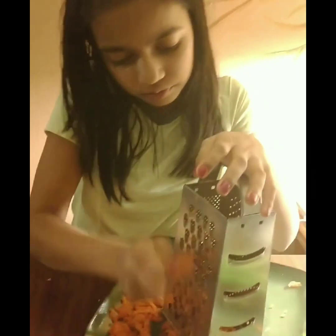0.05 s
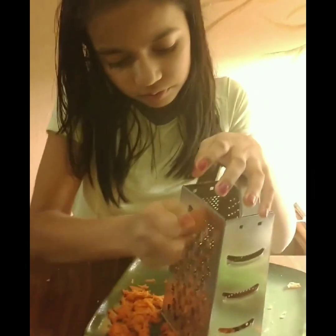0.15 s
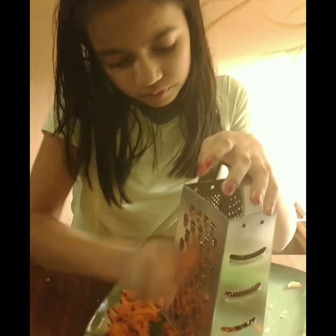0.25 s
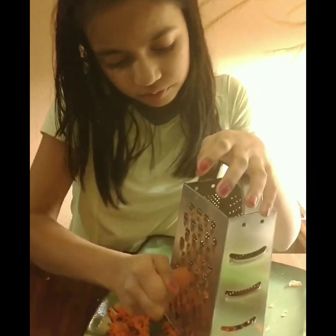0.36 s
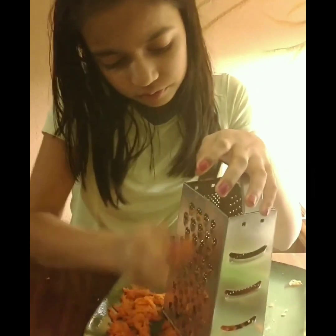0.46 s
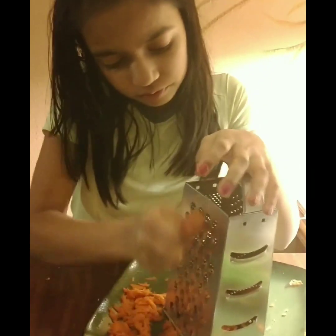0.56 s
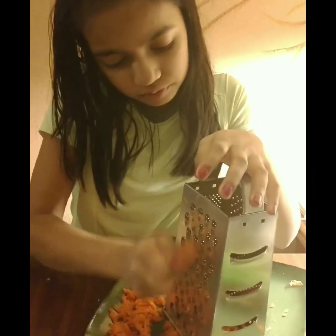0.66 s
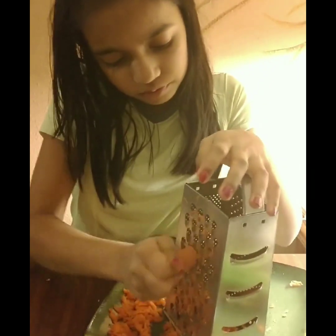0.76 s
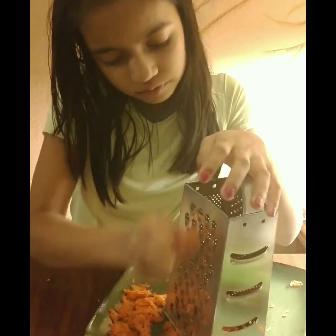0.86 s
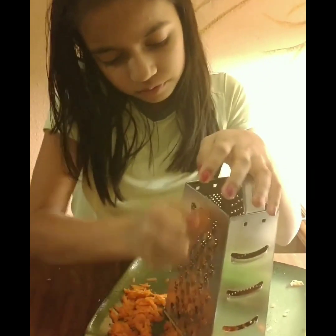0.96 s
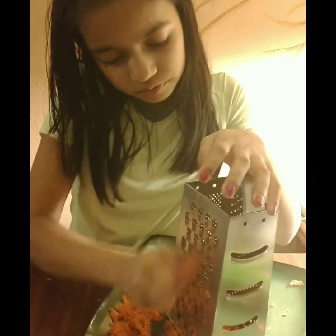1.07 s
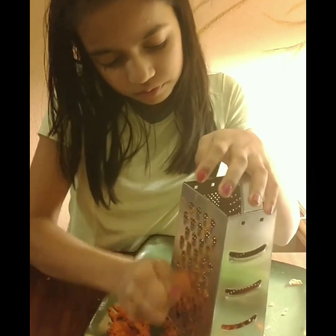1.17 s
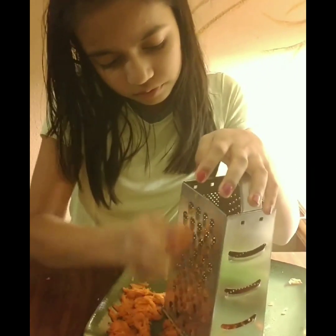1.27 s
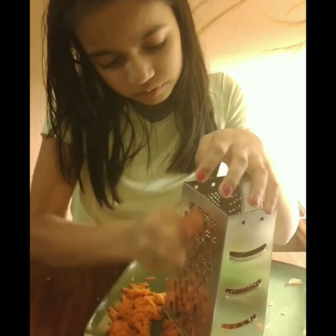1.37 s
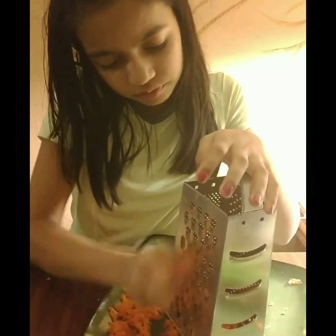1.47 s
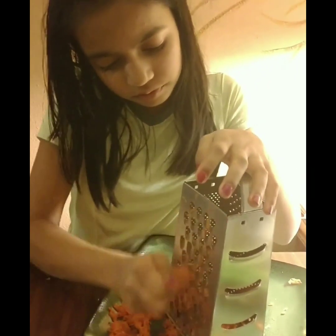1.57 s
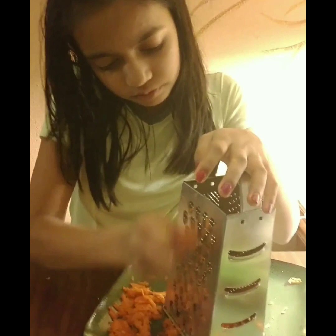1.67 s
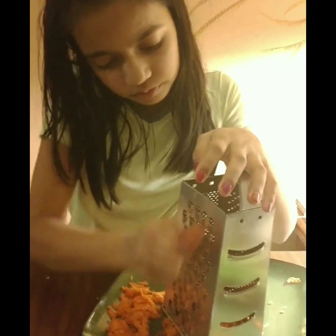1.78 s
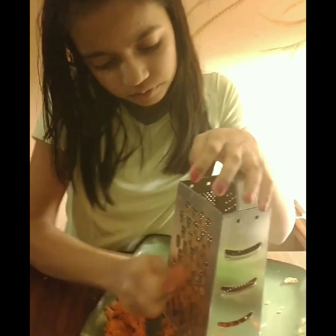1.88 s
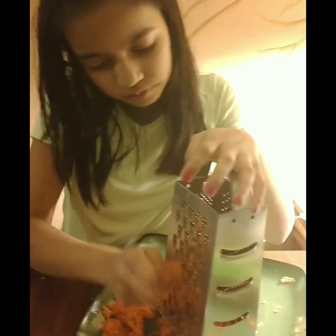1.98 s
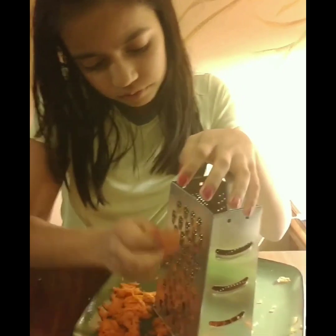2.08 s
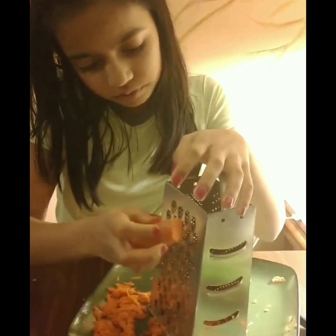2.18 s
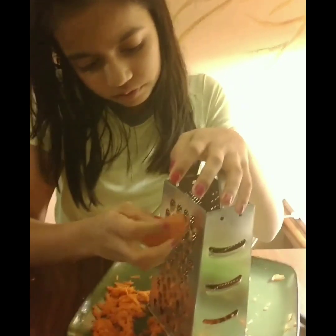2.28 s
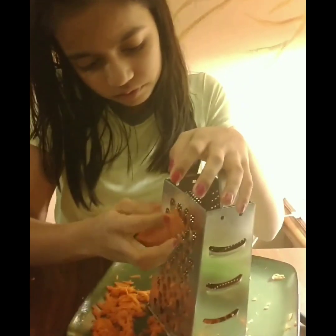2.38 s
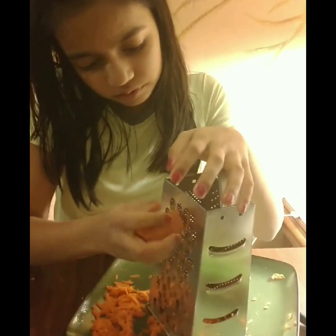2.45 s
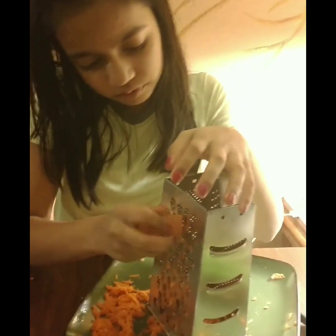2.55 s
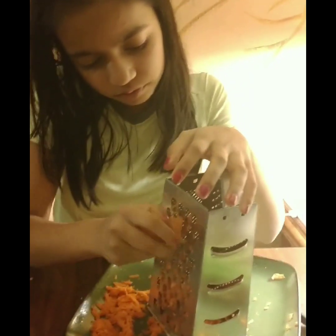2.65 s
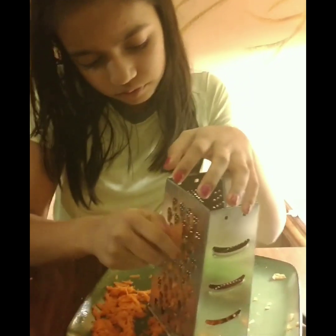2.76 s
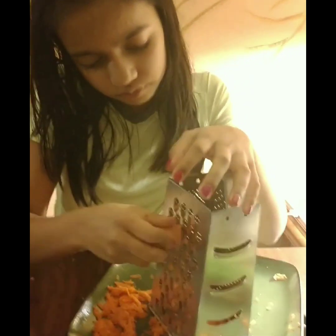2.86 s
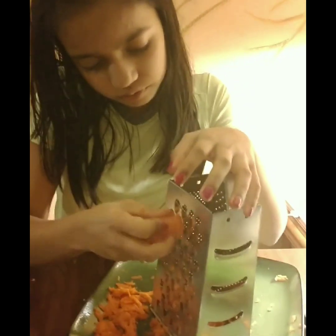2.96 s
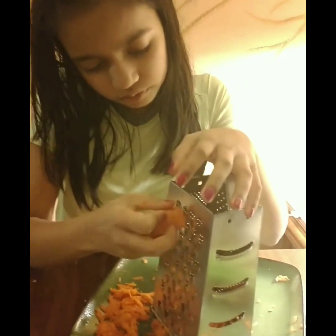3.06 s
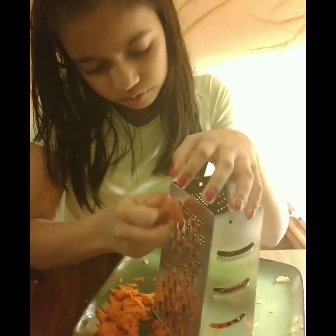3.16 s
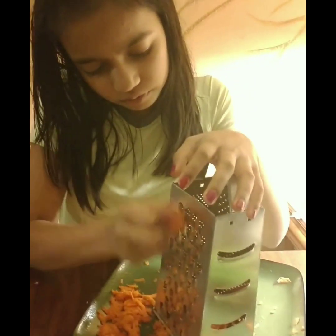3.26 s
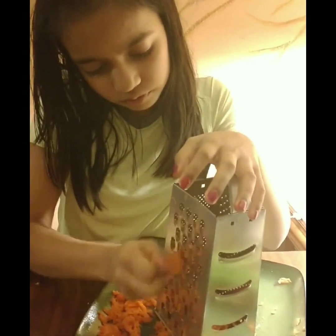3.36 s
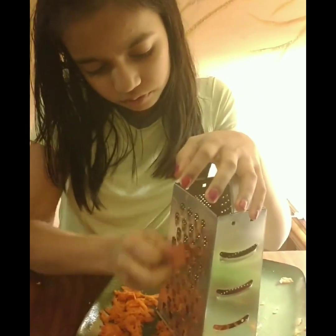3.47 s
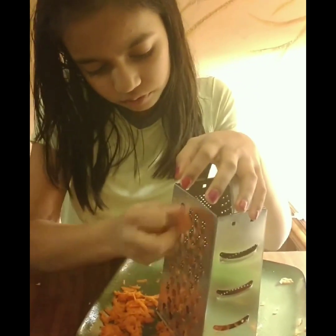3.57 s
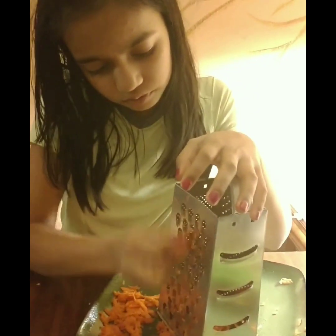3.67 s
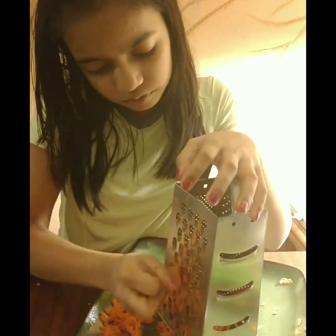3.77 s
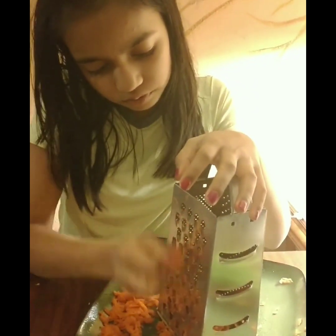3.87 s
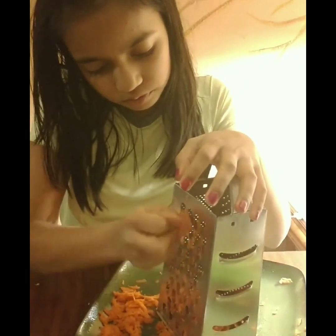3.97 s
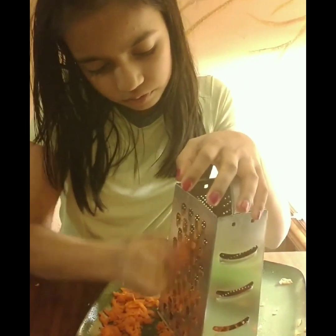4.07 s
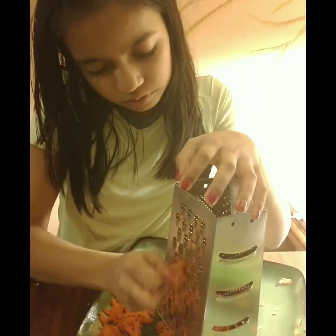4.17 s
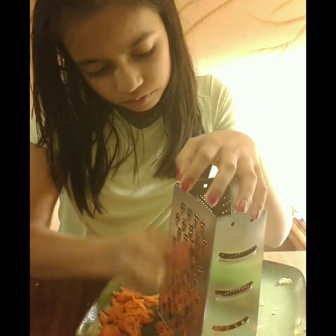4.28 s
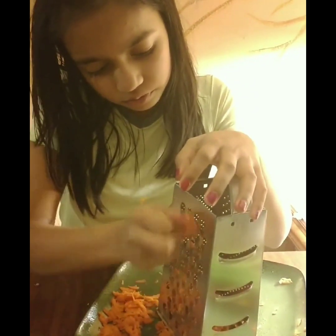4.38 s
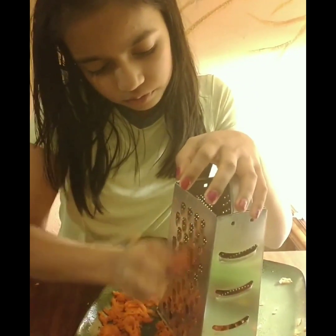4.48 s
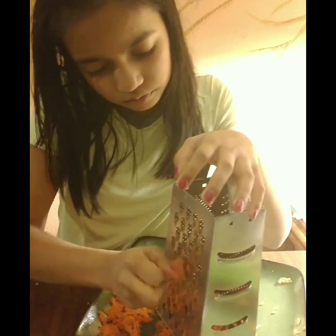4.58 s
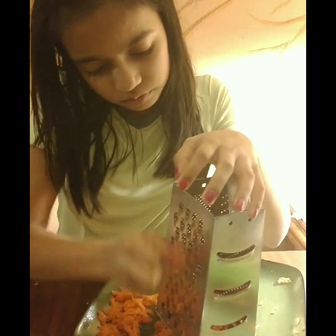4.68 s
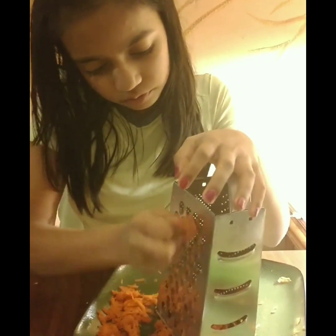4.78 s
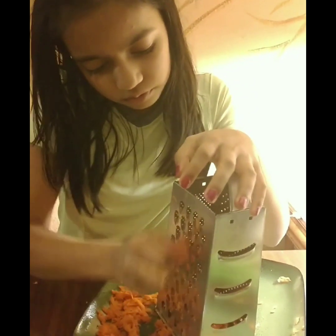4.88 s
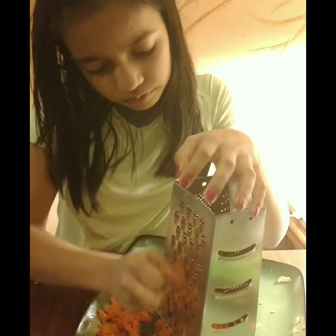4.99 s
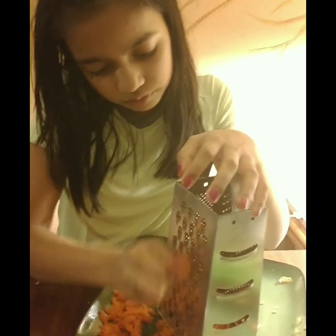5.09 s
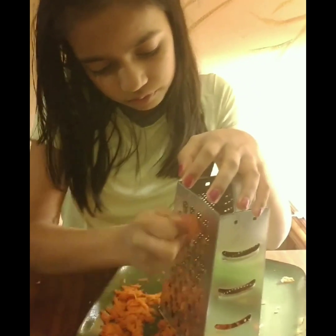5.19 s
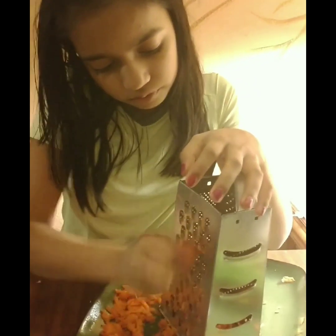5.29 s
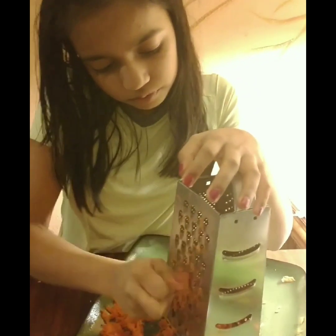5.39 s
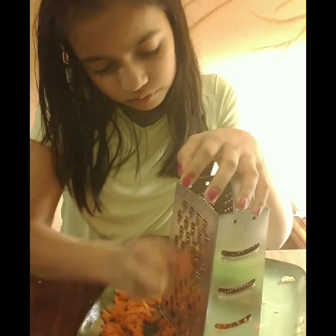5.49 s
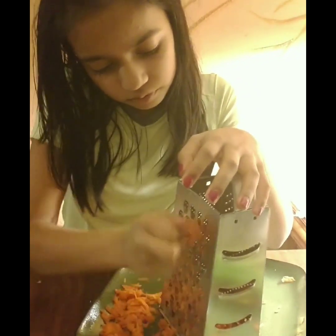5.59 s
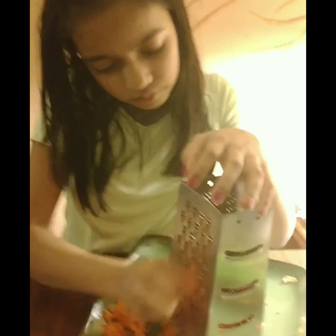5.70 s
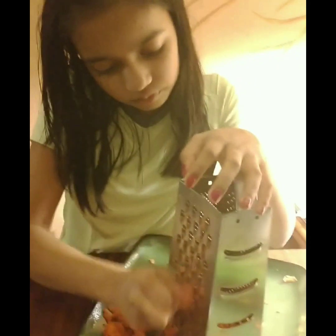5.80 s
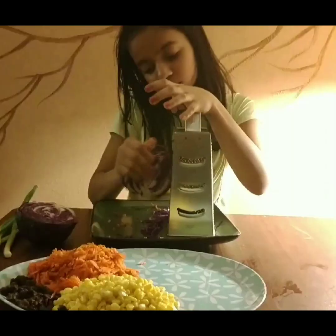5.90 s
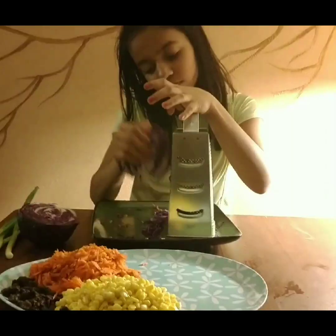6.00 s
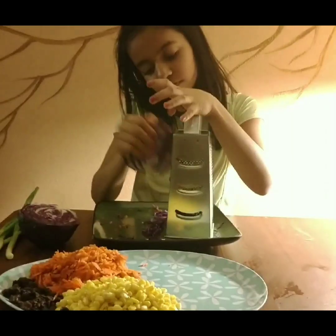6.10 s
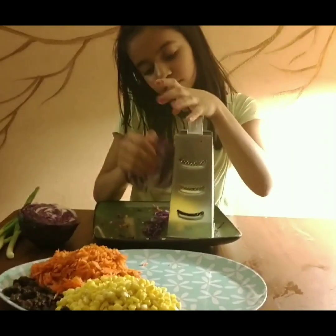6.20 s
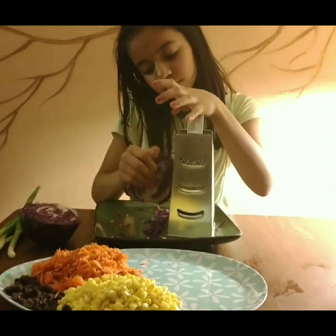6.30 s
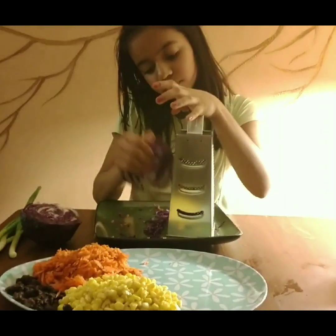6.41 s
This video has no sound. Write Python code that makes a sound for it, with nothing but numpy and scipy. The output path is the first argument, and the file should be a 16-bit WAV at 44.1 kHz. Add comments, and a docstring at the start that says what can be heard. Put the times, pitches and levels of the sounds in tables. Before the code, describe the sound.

A carrot is grated close to the microphone in a small, quiet kitchen. Six even strokes give a wet, crunchy rasp with dull thumps and a hollow metal ring. After a pause with faint ticks, seven more strokes follow. The grater knocks on its plate twice along the way. The sound cuts out for an instant, then cabbage is grated further off, with light scrapes and one hard stroke.

```python
"""A carrot rasps down a steel box grater on a plate: six strokes, a pause to turn it, seven more. Rows of teeth
catch and tear the flesh, giving a wet crunch on top, a shimmer from the steel face and a hollow thrum from the
box. The carrot adds thumps and small wet ticks; twice the grater rocks on the plate. Then the scene changes:
cabbage is grated further away, light scrapes, then a hard one. Underneath lies the room tone of a small
kitchen, soft air and a faint mains hum."""
import sys
import numpy as np
from scipy import signal
from scipy.fft import rfft, irfft
from scipy.io import wavfile
from scipy.ndimage import uniform_filter1d

SR = 44100
rng = np.random.default_rng(int(sys.argv[2]) if len(sys.argv) > 2 else 0)


def generate_wav(signal):
    """Clip the signal to [-1, 1] and save it as 16-bit WAV at the path in sys.argv[1]."""
    frames = np.transpose(np.atleast_2d(signal))
    scaled = np.clip(frames, -1, 1) * 32767
    pcm = np.round(scaled).astype(np.int16)
    wavfile.write(sys.argv[1], SR, pcm)


N = 284332
T = np.arange(N) / SR

# carrot strokes, and light brushes as it is turned or lifted; levels are ahead of the layer trims:
# t/s, speed-up/s, slow-down/s, first bite below full push/dB, tear level/dB, thrum level/dB, face level/dB
CARROT_STROKES = [ (0.002, .085, 0.054, 13, -45, -35, -44), (0.392, 0.1, 0.031, 14, -44.5, -32.5, -48),
                  (0.771, 0.084, 0.045, 12, -45, -34, -47.5), (1.169, 0.092, 0.054, 10, -47.5, -34, -48.5),
                  (1.574, 0.089, 0.039, 10.5, -44.5, -31.5, -47),
                  (1.953, 0.093, 0.043, 15.5, -44, -33, -44.5), (2.57, .020, .120, 3, -76, -68, -82),
                  (3.02, 0.024, 0.023, 8, -77, -57, -67), (3.482, 0.063, 0.046, 5, -54, -44.5, -55),
                  (3.812, .120, .034, 15, -47, -38, -48), (4.11, 0.055, 0.073, 6, -64.5, -56, -59.5),
                  (4.228, 0.074, 0.043, 11.5, -46, -35, -43), (4.592, 0.1, 0.045, 11, -47.5, -33.5, -46.5),
                  (5.004, 0.069, 0.082, 11, -48.5, -36, -44), (5.412, .085, 0.057, 17, -45.5, -31.5, -40),
                  (5.799, 0.086, 0.023, 13.5, -45, -31, -43.5)]
# the carrot lands on the grater or snags on a tooth: t/s, level/dB
CARROT_BUMPS = [(0.002, -32), (0.057, -24), (0.139, -28.5), (0.379, -26), (0.499, -23), (0.746, -35),
                (0.787, -32), (1.137, -32), (1.281, -21.5), (1.322, -28), (1.554, -24.5), (1.722, -37.5),
                (1.933, -36), (1.98, -26.5), (2.509, -42), (3.52, -35), (3.788, -38), (3.833, -27.5),
                (4.18, -38), (4.23, -24), (4.339, -25.5), (4.58, -32.5), (4.737, -32.5), (4.981, -27),
                (5.037, -24), (5.127, -21.5), (5.385, -32.5), (5.459, -22), (5.53, -27), (5.777, -32),
                (5.858, -21)]
# small wet ticks and scrapes as the carrot lands, is handled or sheds shreds: t/s, level/dB
WET_TICKS = [(0.3763, -50), (1.552, -45), (2.5813, -52.5), (2.631, -63), (2.6903, -57), (3.652, -52),
             (4.385, -55), (4.581, -42), (4.983, -44.5), (5.634, -46), (6.202, -47)]
# the grater's rim strikes the plate: t/s, level/dB, contact/ms
RIM_KNOCKS = [(1.0154, -12, 0.17), (4.2289, -18.5, 0.21)]
# cabbage strokes: t/s, speed-up/s, slow-down/s, first bite below full push/dB, tear level/dB, thrum level/dB
CABBAGE_STROKES = [(6.02, 0.045, 0.032, 13, -66.5, -52.5), (6.2, 0.019, 0.092, -15, -67.5, -56.5),
                   (6.348, 0.011, 0.035, 9, -52.5, -38.5), (6.374, 0.011, 0.047, -12, -47, -27)]
# the cabbage slams into the blades: t/s, level/dB, contact/ms
CABBAGE_JOLTS = [(6.0752, -29.5, 0.17), (6.352, -50, 0.36), (6.376, -21, 0.086), (6.3995, -12, 0.53),
                 (6.438, -38, 0.23)]
# tone curve of tearing flesh: f/Hz, level/dB
TEAR_SPECTRUM = [(550, -6), (900, 9.5), (1300, 2), (1650, -3.5), (2200, -3.5), (2900, 8), (3600, 1.5),
                 (4400, -1), (5600, -1), (6600, -2.5), (11000, -3), (12300, -5), (15800, -5)]
# the grater's toothed face: f/Hz, width/Hz, level/dB
FACE_MODES = [(850, 40, -8), (950, 63, 1), (1370, 44, -12.5), (1590, 13, -2.5), (1626, 62, -6.5),
              (2675, 41, -0.5), (2873, 30, -0.5), (3050, 37, -1.5), (3270, 24, -2), (3550, 44, -4.5),
              (5490, 43, -6.5), (5770, 60, -14)]
# the steel box, damped by the hand on top: f/Hz, width/Hz, level/dB
BOX_MODES = [(153.6, 28, -15), (164.6, 9.6, -16.5), (238.3, 12.7, -4), (277, 26, -9.5), (297, 22, -4.5),
             (336, 21, 0.5), (368.7, 13, 0), (419.5, 29, -5.5), (546, 10, -1.5), (560.4, 16.6, -11.5),
             (646, 60, -17), (754, 134, -9.5), (835, 15, -21), (889, 41, -8), (1010, 60, -16),
             (1016, 138, -9.5), (1217, 108, -10.5), (1454, 13, -13.5), (1562, 93, -19), (1684, 160, -10.5)]
# the plate on the table: f/Hz, width/Hz, level/dB
PLATE_MODES = [(168, 34, -35), (245, 20, -27), (280, 15, -23), (337, 29, 2.5), (365, 15, 10),
               (440, 18, -27), (420, 16, 5.5), (533, 14, 15.5), (545, 14, -29), (668, 19, 1.5),
               (980, 50, -25), (943, 66, -32), (990, 28, -9), (1060, 61, -19.5), (1265, 20, -11.5),
               (1497, 58, -41), (1640, 54, -21), (2470, 38, -22), (3000, 830, -24)]
# grater and plate pressed together under the cabbage: f/Hz, width/Hz, level/dB
PRESSED_MODES = [(167, 13, -41), (262.5, 16, 2.5), (378, 21, 2.5), (474, 18, -0.5), (550, 21, -3),
                 (647, 15, 3), (697, 34, -1.5), (742, 17, -2), (833, 42, 1), (935, 24, -9),
                 (1020, 35, -1.5), (1073, 16, -4), (1200, 120, -11), (1280, 29, -3.5), (1270, 26, -15),
                 (1500, 30, -27), (1647, 60, -3), (1600, 45, -23), (1780, 20, -35)]
# tone curve of the kitchen air: f/Hz, level/dB
AIR_SPECTRUM = [(15, -50), (25, -11), (55, -15.5), (86, -12), (123, -5), (148, -14), (184, 0.5),
                (216, -10.5), (498, -8.5), (618, -13), (1540, -19), (1920, -29), (2870, -23), (4300, -31),
                (15700, -39.5)]
# two hollow dips in the tone: f/Hz, width/Hz, level/dB
TONE_DIPS = [(2156, 116, -17), (4370, 490, -11)]

TOP_HZ = 15830  # upper edge of the treble


def carrot(tear_trim_db=3.5, thrum_trim_db=-1.37, face_trim_db=-2):
    """Downstrokes on the coarse face; the steel rings on a little after the tearing lets go."""
    tear = amp(tear_trim_db) * stroke_envelope(CARROT_STROKES, column=4)
    thrum = amp(thrum_trim_db) * stroke_envelope(CARROT_STROKES, column=5, hold_s=0.0042)
    shimmer = amp(face_trim_db) * stroke_envelope(CARROT_STROKES, column=6, hold_s=0.0087)
    return grating(tear, thrum, shimmer, steel_box(), rows_per_s=140, row_scatter_db=0.5,
                   tear_ms=13, crackle_db=-3, judder_db=-4)


def stroke_envelope(table, column, hold_s=0, contact_s=0.0054, sag_db=4, release_db_per_s=283,
                    brush_db=-23, brush_fade_db_per_s=62):
    """One layer's gain: each stroke bites, follows the hand's speed, sags, lets go and brushes back up."""
    out = np.zeros(N)
    for stroke in table:
        start, rise_s, slow_s, bite_db = stroke[:4]
        age = T - start
        contact = np.clip(age / contact_s, 0, 1)  # the flesh sinks onto the teeth
        speeding = np.clip(age / rise_s, 0, 1)
        slowing = np.clip((age - rise_s) / slow_s, 0, 1)
        released_s = np.maximum(age - rise_s - slow_s - hold_s, 0)
        push_db = -bite_db * (1 - speeding) ** 2 - sag_db * slowing ** 2 - release_db_per_s * released_s
        effort_db = np.maximum(push_db, brush_db - brush_fade_db_per_s * released_s)
        out = np.maximum(out, contact * amp(stroke[column] + effort_db))
    return out


def grating(tear_gain, thrum_gain, face_gain, body, rows_per_s, row_scatter_db,
            tear_ms, crackle_db, judder_db):
    """Each row of teeth jerks the box and opens a short tear, in which cells burst by the thousand."""
    rows = catches(rows_per_s, jitter=.45, scatter_db=row_scatter_db, count=3000)
    tearing = unit(convolve(rows, np.exp(-T[:2048] * 1000 / tear_ms)))
    cells = catches(2400, jitter=.9, scatter_db=2.5, count=30000) * rng.choice([-1, 1], N)
    grit = rng.standard_normal(N) + amp(crackle_db) * unit(cells)
    crunch = unit(np.sqrt(np.abs(tearing)) * grit)
    rasp = convolve(unit(shreds(crunch)) * tear_gain, colour(TEAR_SPECTRUM))
    # the box feels the jerks of the rows and the drag of the wet flesh between them
    drag = unit(crunch + amp(judder_db) * unit(rows - rows.mean()))
    return rasp + steel_face(crunch) * face_gain + convolve(drag * thrum_gain, body)


def catches(per_s, jitter, scatter_db, count):
    """Ragged pulses, uneven in timing and size, as teeth bite and let go."""
    timing, size = rng.standard_normal((count, 2)).T
    at = (np.cumsum(np.exp(jitter * timing)) / per_s * SR).astype(int)
    return np.bincount(at[at < N], amp(scatter_db * size[at < N]), N)


def shreds(crunch, flare_db=2.5, flares_per_s=80, band_count=14):
    """Every shred tears at a pitch of its own, so neighbouring bands flare up separately."""
    spectrum, hz = rfft(crunch), np.fft.rfftfreq(N, 1 / SR)
    centres = np.linspace(0, TOP_HZ, band_count)
    bands = (irfft(spectrum * np.interp(hz, centres, share), N) for share in np.eye(band_count))
    return sum(band * amp(flare_db * wander(flares_per_s)) for band in bands)


def steel_face(crunch, shift_db=6, shifts_per_s=16, bend_s=.0015, bends_per_s=7):
    """Shimmer: the sliding flesh favours one mode, then another, and its weight bends their pitch."""
    out = 0
    for hz, width, db in FACE_MODES:
        mode = resonance(crunch, hz, width)
        bent = np.interp(T + bend_s * wander(bends_per_s), T, mode)
        out = out + unit(bent) * amp(db + shift_db * np.tanh(wander(shifts_per_s)))
    return unit(out) * np.std(crunch)


def steel_box():
    """The hollow box takes a few milliseconds to speak."""
    return ring(BOX_MODES, swell_s=0.004393)


def wet_ticks(trim_db=-3, decay_s=0.044):
    """Small wet ticks and scrapes as the carrot lands, is handled or sheds shreds."""
    out, tear = np.zeros(N), colour(TEAR_SPECTRUM)
    decay = np.exp(-T[:len(tear)] / decay_s)
    for s, db in WET_TICKS:
        tick = convolve(rng.standard_normal(len(tear)) * decay, tear)
        add(out, s, amp(db + trim_db) * tick / np.abs(tick).max())
    return out


def bumps(contact_ms=1.87):
    """The soft carrot lands on the box with a dull thump."""
    hits = [(s, db, contact_ms) for s, db in CARROT_BUMPS]
    return blows(hits, steel_box(), chatter_db=-1, chatter_s=.022)


def plate_knocks():
    """The grater rocks and its hard rim rings the plate."""
    return blows(RIM_KNOCKS, ring(PLATE_MODES, swell_s=0.0013), chatter_db=-10, chatter_s=.035)


def cabbage(tear_trim_db=1, thrum_trim_db=-1, face_to_tear_db=-8):
    """The firm cabbage shakes grater and plate together."""
    tear = amp(tear_trim_db) * stroke_envelope(CABBAGE_STROKES, column=4)
    thrum = amp(thrum_trim_db) * stroke_envelope(CABBAGE_STROKES, column=5)
    body = ring(PRESSED_MODES, swell_s=0.0015)
    shredding = grating(tear, thrum, amp(face_to_tear_db) * tear, body, rows_per_s=190,
                        row_scatter_db=4, tear_ms=7, crackle_db=-5.5, judder_db=-4.5)
    return shredding + blows(CABBAGE_JOLTS, body, chatter_db=0.5, chatter_s=0.014)


def blows(hits, body, chatter_db, chatter_s):
    """Each hit rings the body, then chatters as the parts settle; longer contact sounds duller."""
    out = np.zeros(N)
    for s, db, contact_ms in hits:
        progress = T[:512] * 1000 / contact_ms
        push = progress * np.exp(-4 * progress)
        chatter = rng.standard_normal(4096) * np.exp(-T[:4096] / chatter_s)
        contacts = signal.unit_impulse(len(chatter)) + amp(chatter_db) * chatter / np.linalg.norm(chatter)
        blow = convolve(convolve(body, push), contacts)
        add(out, s, amp(db) * blow / np.abs(blow).max())
    return out


def ring(modes, swell_s, low_cut_hz=170):
    """Unit-energy ring of a body whose decaying modes come into step after swell_s."""
    t = T[:16384]
    partials = sum(amp(db) * width * np.exp(-np.pi * width * t) * np.cos(2 * np.pi * hz * (t - swell_s))
                   for hz, width, db in modes)
    # a small object radiates no deep bass
    low_cut = signal.butter(3, low_cut_hz, "high", fs=SR, output="sos")
    response = signal.sosfilt(low_cut, partials * np.minimum(t / swell_s, 1))
    return response / np.linalg.norm(response)


def reverb(x, t60_s=0.3, predelay_s=0.0095, damping_hz=5000):
    """Diffuse reflections of a small kitchen, soft in the treble."""
    t = T[:SR // 2]
    onset = np.clip(t / predelay_s - 1, 0, 1)
    tail = rng.standard_normal(len(t)) * np.exp(-np.log(1000) * t / t60_s) * onset
    return convolve(x, signal.lfilter(*signal.butter(1, damping_hz, fs=SR), tail / np.linalg.norm(tail)))


def room_tone(air_db=-58.5, hum_db=-73, hum_hz=59.5):
    """A bed of still kitchen air and faint mains hum."""
    air = convolve(rng.standard_normal(N), colour(AIR_SPECTRUM, size=16384))
    hum = np.sqrt(2) * np.sin(2 * np.pi * hum_hz * T)
    return amp(air_db) * air + amp(hum_db) * hum


def colour(points, size=4096):
    """Unit-energy impulse response that follows a tone curve and rolls off beyond its ends."""
    hz, db = np.transpose(points)
    freqs = np.maximum(np.fft.rfftfreq(size, 1 / SR), 1)
    skirt = np.minimum(freqs / hz[0], 1) ** 2 * np.minimum(hz[-1] / freqs, 1) ** 2
    curve = amp(np.interp(np.log(freqs), np.log(hz), db))
    cepstrum = irfft(np.log(skirt * curve))
    cepstrum[1:size // 2] *= 2  # minimum phase keeps attacks crisp
    response = irfft(np.exp(rfft(cepstrum[:size // 2], size)))
    return response / np.linalg.norm(response)


def resonance(x, hz, width_hz):
    """One resonant band of a sound."""
    return signal.lfilter(*signal.iirpeak(hz, hz / width_hz, fs=SR), x)


def wander(per_s):
    """Random modulation with a spread near 1."""
    return 1.2 * np.interp(T * per_s, np.arange(2000), rng.standard_normal(2000))


def amp(db):
    """Decibels to gain."""
    return 10 ** (np.asarray(db) / 20)


def unit(x):
    """Scale to rms 1."""
    return x / np.sqrt(np.mean(x ** 2))


def convolve(x, response):
    """Pass a sound through an impulse response."""
    return signal.fftconvolve(x, response)[:len(x)]


def add(out, s, x):
    """Mix a short sound in at time s."""
    start = int(np.clip(s * SR, 0, N - 1))
    out[start:start + len(x)] += x[:N - start]


def scene(near_reverb_db=-12, far_reverb_db=-3, cut_s=5.95, resume_s=6.017, air_fade_s=0.25):
    """Carrot close and fairly dry; then the scene changes to cabbage further off and roomier."""
    near = plate_knocks() + carrot() + wet_ticks() + bumps()
    far, air = cabbage(), room_tone()
    gate = uniform_filter1d(1. * (T < cut_s), size=64)
    fade_in = np.clip((T - resume_s) / air_fade_s, 0, 1)
    before = (near + amp(near_reverb_db) * reverb(near) + air) * gate
    after = far + amp(far_reverb_db) * reverb(far) + air * fade_in
    return (before + after)[None]


def record(dry):
    """Two hollow dips in the tone, near 2.2 and 4.4 kHz, and a steep cut of the top treble."""
    for hz, width, db in TONE_DIPS:
        dry = dry - (1 - amp(db)) * resonance(dry, hz, width)
    return signal.sosfilt(signal.ellip(14, .2, 80, TOP_HZ, fs=SR, output="sos"), dry)


dry = scene()
out = record(dry)
generate_wav(out)
```